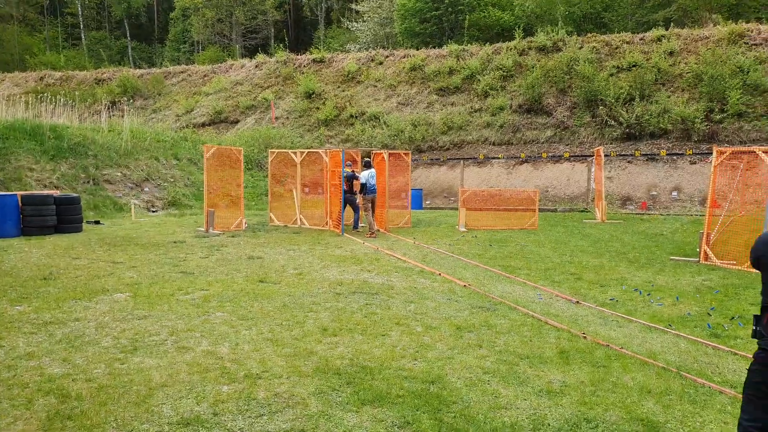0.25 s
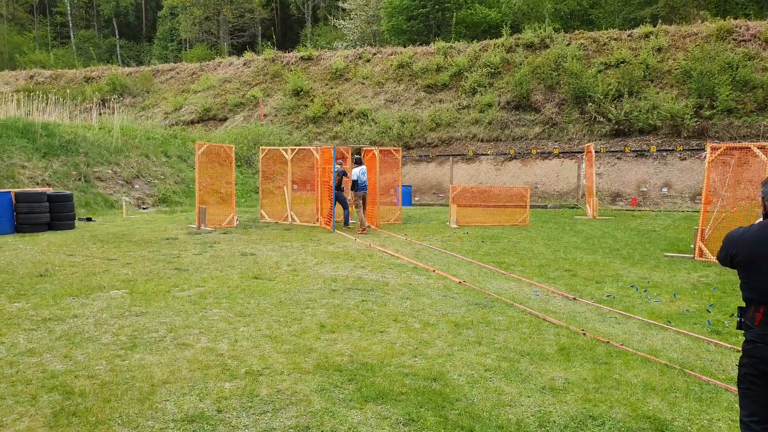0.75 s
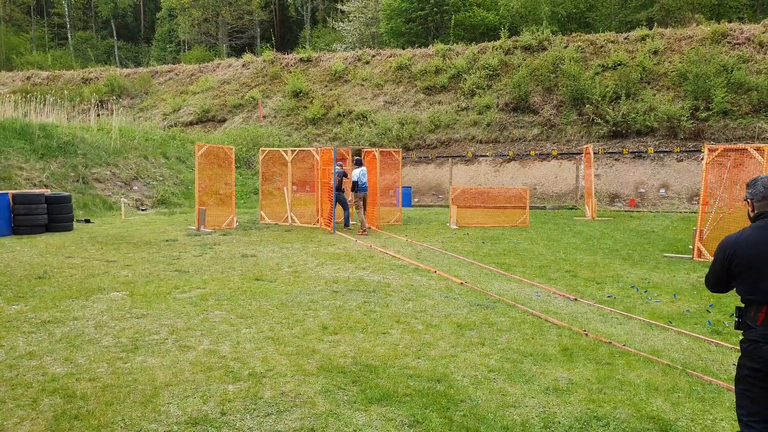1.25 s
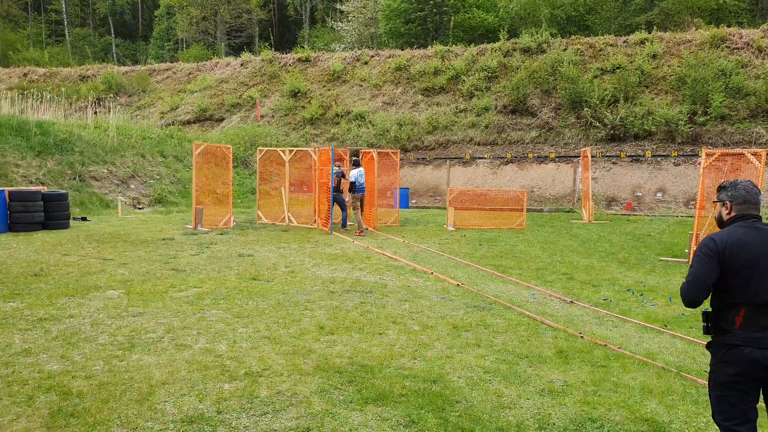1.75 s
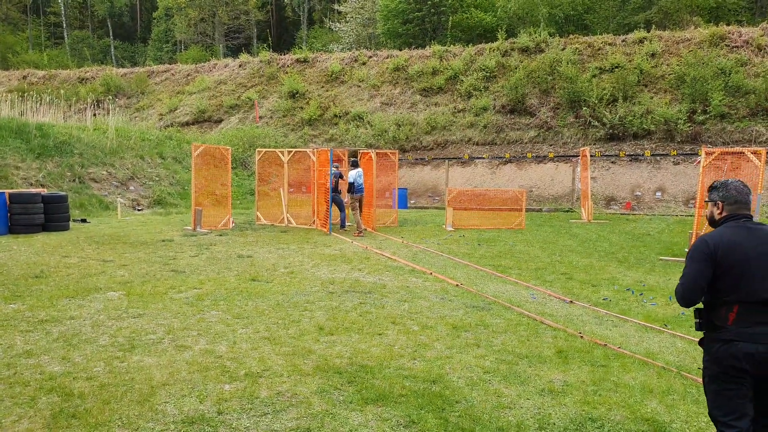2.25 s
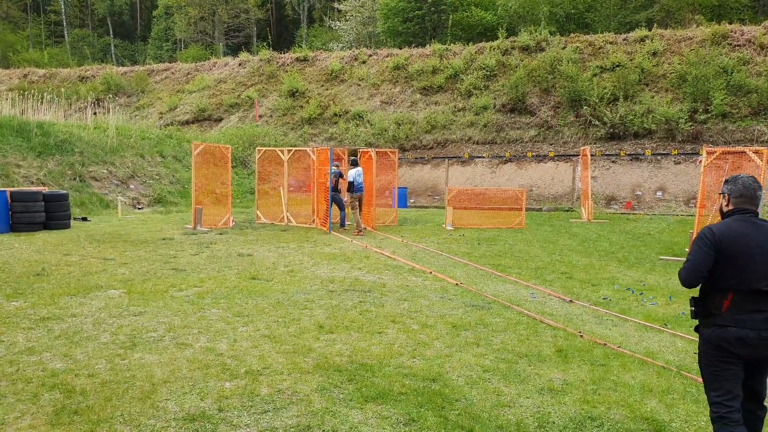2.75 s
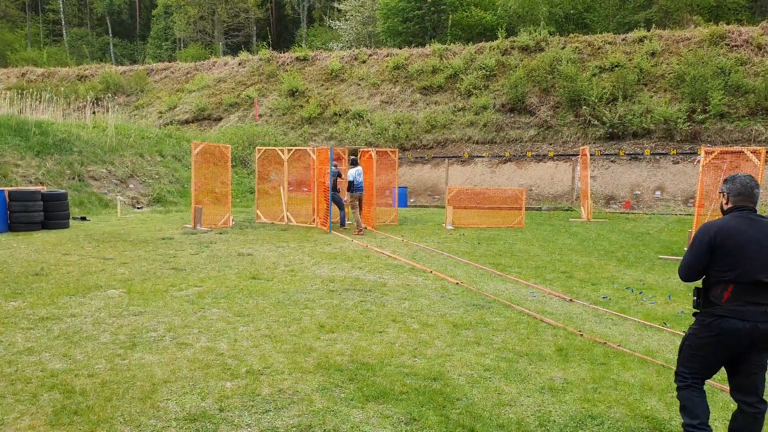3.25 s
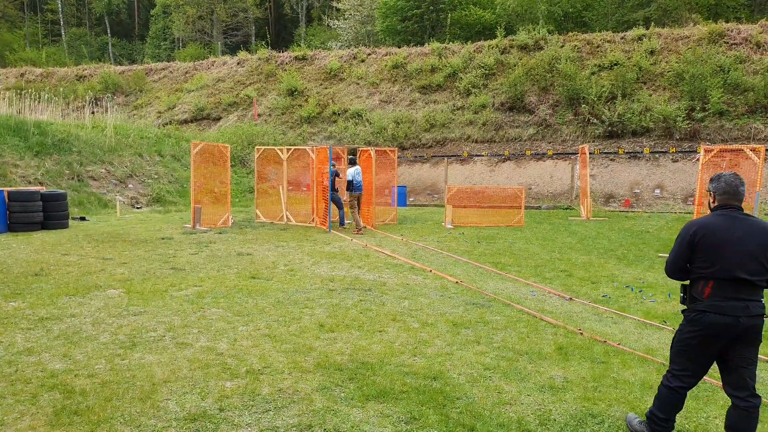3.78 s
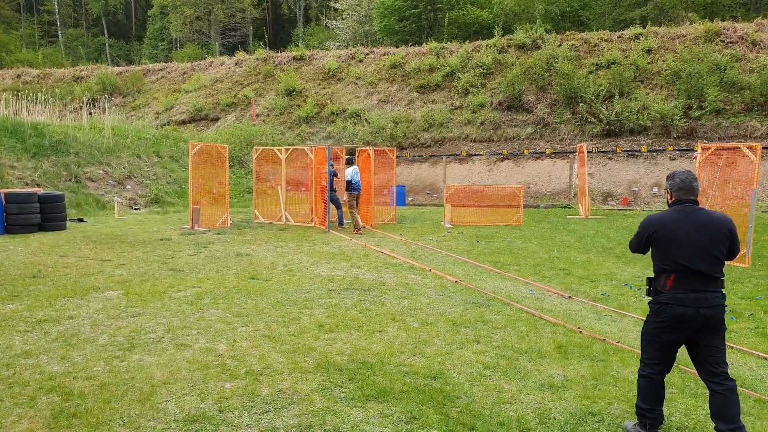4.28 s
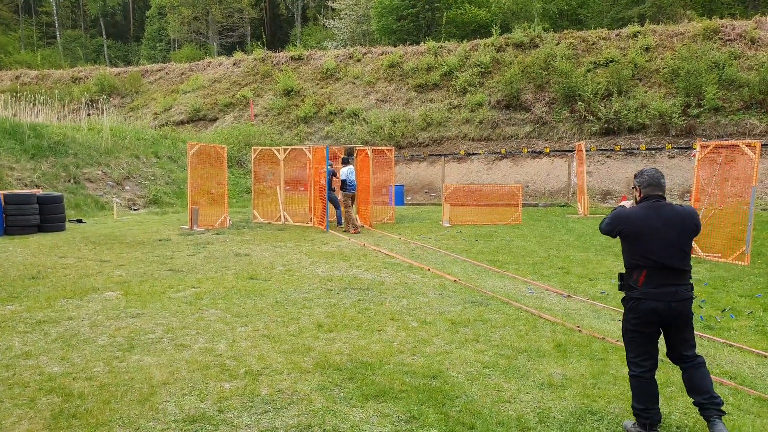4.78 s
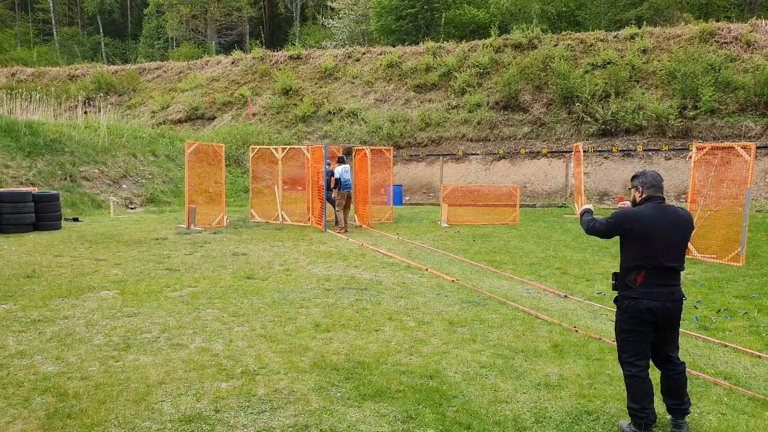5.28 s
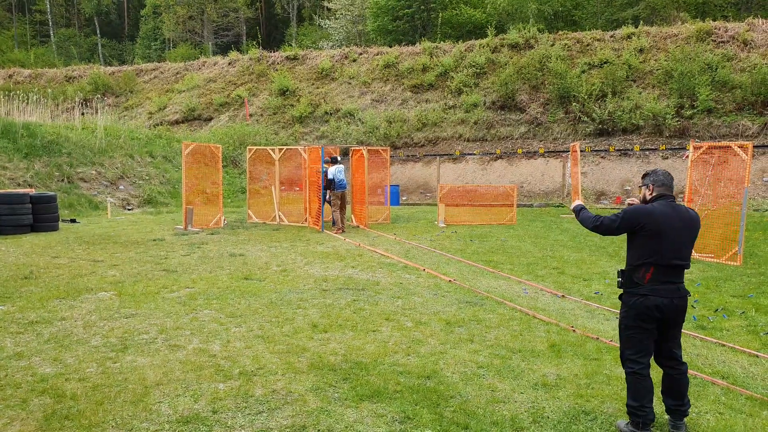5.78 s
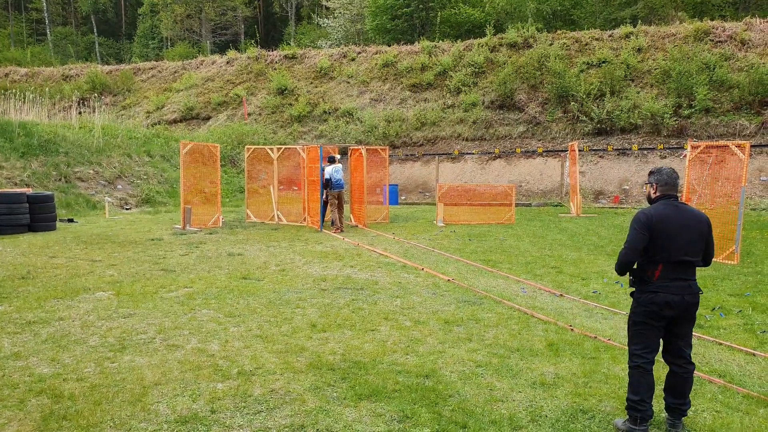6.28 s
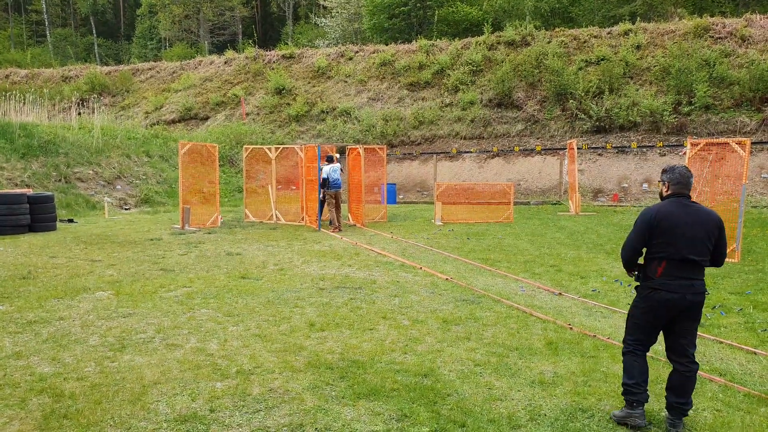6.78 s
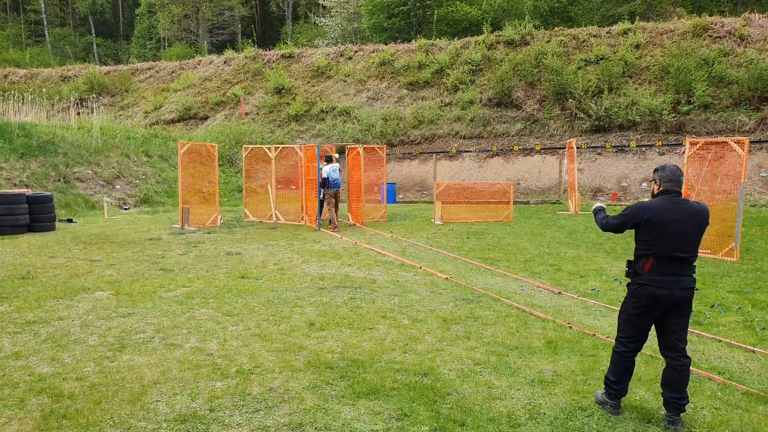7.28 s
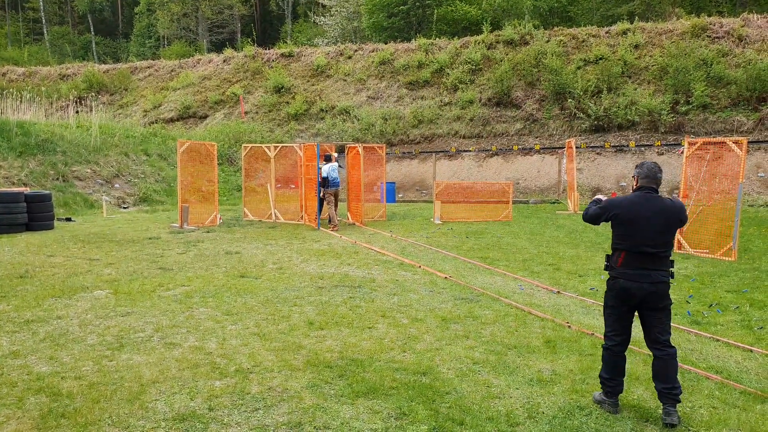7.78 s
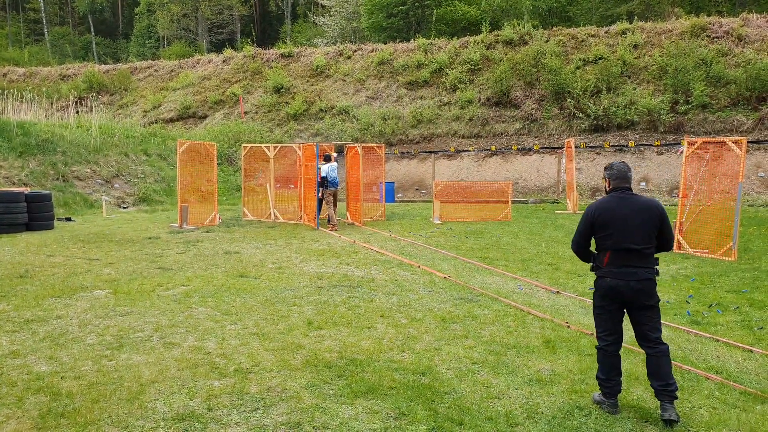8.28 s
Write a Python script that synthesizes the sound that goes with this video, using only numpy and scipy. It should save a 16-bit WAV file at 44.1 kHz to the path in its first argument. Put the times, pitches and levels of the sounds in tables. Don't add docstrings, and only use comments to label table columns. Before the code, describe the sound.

Loud single shotgun shots, three followed by pellets hitting ringing steel, roll off earth banks and trees while a gun is worked in gusty wind.

```python
import sys
import numpy as np
from scipy import signal
from scipy.fft import rfft, irfft
from scipy.io import wavfile
from scipy.ndimage import uniform_filter1d, minimum_filter1d

SR = 44100
rng = np.random.default_rng(int(sys.argv[2]) if len(sys.argv) > 2 else 0)


def to_linear_factor(level_db):
    exponent = np.asarray(level_db, float) / 20
    return 10 ** exponent


def put_to_file(sound):
    columns = np.atleast_2d(sound).T
    safe = np.clip(columns, -1, 1)
    whole_steps = np.round(safe * 32767)
    wavfile.write(sys.argv[1], SR, whole_steps.astype(np.int16))


N = 376128

# (time [s], blast level [dB], bass level [dB], tail length [factor])
SHOTS = [
    (1.3948, 2.5, -1.5, 1.21),
    (2.6301, 3, 0, 1.33),
    (3.3917, 2.5, 1, 1.27),
    (4.9005, 4, 6.5, 1.2),
    (7.654, 0.5, 1, 1.1),
]
STANCE_S = (.0005, 0, 0, -.0005, 0)
CRACK_DB = (-24, -36, -36, -35, -40)
# (delay [s], left level [dB], right level [dB])
FRONTS_AHEAD = [(0, 0, 0), (.0362, -1, -3), (.0395, -8, -7), (.041, -6, -6), (.0485, -6, -7),
                (.076, -11, -8), (.0435, -8, -8), (.082, -11, -9), (.084, -8, -4), (.086, -10, -7),
                (.088, -11, -7)]
FRONTS_ASIDE = [(0, -1, 0), (.0235, -9, -8), (.0343, -2, -3), (.036, -6, -6), (.0385, -6, -5),
                (.0415, -5, -5), (.0742, -9, -7), (.0818, -6, -1)]
# (delay [s], scatter level [dB], fade [s], bass [dB], treble [dB])
BANKS_AHEAD = [(.001, -15, 0.0065, 8, -2), (.007, -25, .006, 0, 0), (0.012, -24, 0.037, 3, 4),
               (0.0378, -11, 0.0042, 0, -4), (0.0369, -15.5, 0.006, -2, -8.5), (.047, -21, 0.02, -18, 7),
               (.062, -21, .015, 3.5, 12.5), (.074, -18, 0.0044, 2.5, -0.5), (.082, -17.5, 0.0089, -1, 1),
               (.102, -19, 0.016, 19.5, 16), (.118, -26.5, 0.0055, -2, 17)]
BANKS_ASIDE = [(.001, -14, 0.006, 0, -3), (.013, -15.5, 0.021, -8, -6), (0.0353, -15.5, 0.0065, 0, 3),
               (0.037, -9.5, 0.009, -3, -19), (0.051, -21, 0.03, -11, 6), (.07, -14, .006, -11, -14),
               (.08, -11, 0.0065, -24, -12), (0.093, -23.5, 0.027, -17, -2)]
# (delay [s], scatter level [dB], fade [s])
SLOPES_AHEAD = [(.186, -33, 0.012), (.232, -30.5, .012), (.285, -32, 0.012), (.33, -35, 0.02),
                (.36, -37, .01), (0.394, -32, 0.008), (.455, -38, .01), (.486, -29, .012), (.508, -34, .01),
                (.534, -31, 0.012), (.572, -38, .01), (.597, -36, 0.01), (.615, -38, .012),
                (.695, -44, .01), (.745, -42, .012)]
SLOPES_ASIDE = [(.165, -32.5, 0.061), (.225, -28, 0.026), (.285, -29.5, .0255), (.4, -30, 0.005)]
SLOPE_BASS_DB, SLOPE_TREBLE_DB_PER_S = -24, -42
SHOT_TREBLE_DB = 3.5
FRONT_LAG, LAG_PER_S = 2.9, 26
RIGHT_BANK_S, RIGHT_BANK_LAG = (.07, .09), -2.5
CRACK_LEAD_S, CRACK_FADE_S = .0035, .012


def gun():
    out = np.zeros((2, N))
    surfaces = rng.standard_normal((28, 2, 8192))
    for k, (s, db, bass_db, stretch) in enumerate(SHOTS):
        aside = k == 4
        fronts = FRONTS_ASIDE if aside else FRONTS_AHEAD
        near = BANKS_ASIDE if aside else BANKS_AHEAD
        far = SLOPES_ASIDE if aside else SLOPES_AHEAD
        echoes = near + [(*row, SLOPE_BASS_DB, SLOPE_TREBLE_DB_PER_S * row[0]) for row in far]
        shift = STANCE_S[k]
        shot = woods(stretch, SHOT_TREBLE_DB)
        for surface, (delay, echo_db, fade_s, low_db, high_db) in zip(surfaces, echoes):
            from_right = RIGHT_BANK_S[0] < delay < RIGHT_BANK_S[1]
            lag = RIGHT_BANK_LAG if from_right else FRONT_LAG + LAG_PER_S * delay
            treble_hz = 3000 / (1 + 2.5 * delay)
            sound = echo(surface, echo_db, fade_s, low_db + bass_db, high_db + SHOT_TREBLE_DB, treble_hz, lag)
            add(shot, delay + shift * (delay > .03), sound)
        add(shot, .065, boom(bass_db - (30 if aside else 22.5)))
        add(out, s, to_linear_factor(db) * shot)
        crack = echo(surfaces[-1], CRACK_DB[k], CRACK_FADE_S, -6, -8.5, 4500, FRONT_LAG)
        add(out, s - CRACK_LEAD_S, crack)
        for delay, left_db, right_db in fronts:
            wander, ground, ground_s = 0, .6, .00108
            if delay > .037:
                wander, ground, ground_s = rng.uniform([-.0004, .15, .0005], [.0004, .5, .0016])
            add(out, s + delay + wander + shift * (delay > 0), front(left_db, right_db, ground, ground_s))
    for modes, (s, *strike) in zip(PLATES, STRIKES):
        add(out, s, plate(modes, *strike))
    return out


# (frequency [Hz], level [dB], t60 [s])
CASE_RING = [
    (3100, -13, .004),
    (6100, -17, .008),
]


def front(left_db, right_db, ground, ground_s):
    unit_s = .00013
    u, later = np.arange(400) / (unit_s * SR), ground_s / unit_s

    def jump(u):
        return np.exp(-(u - 1.5) ** 2) - .4 * np.exp(-((u - 4.4) / 1.9) ** 2)

    wave = 1.05 * jump(u) + ground * jump(u - later) + .4 * ground * jump(u - 1.9 * later)
    t = np.arange(len(wave)) / SR
    ring = sum(to_linear_factor(db - 60 * t / t60) * np.sin(2 * np.pi * hz * t) for hz, db, t60 in CASE_RING)
    wave = wave + np.convolve(np.diff(wave, prepend=0), ring)[:len(wave)]
    shadowed = signal.lfilter([0, 0, 0, 0, 0, .38], [1, -.55], wave)
    return to_linear_factor([[left_db], [right_db]]) * np.array([wave, shadowed])


# (frequency [Hz], density [dB per Hz])
BLAST = [(30, -29.5), (60, -15.5), (110, -15), (200, -8), (300, 0.5), (420, -8.5), (620, 2.5), (800, -11),
         (1100, -10.5), (1900, -5.5), (3400, -10.5), (4700, -18), (6200, -19), (8000, -29.5), (12500, -33),
         (15000, -45)]


def echo(surface, db, fade_s, bass_db, treble_db, treble_hz, lag):
    t = np.arange(8192) / SR
    sizes = to_linear_factor(4 * evened(uniform_filter1d(rng.standard_normal(len(t)), 25)))
    spray = (surface + 0.35 * rng.standard_normal(surface.shape)) * evened(sizes)
    a, b = spray * np.exp(-t / fade_s) * np.minimum(t / (.15 * fade_s), 1)
    tone = rng.uniform(.88, 1.15)

    def colour_db(hz):
        bass = bass_db / (1 + (hz / 250) ** 2)
        treble = treble_db / (1 + (treble_hz / (hz + 1)) ** 2)
        air_loss = 6 * (3000 / treble_hz - 1) * (hz / 12000) ** 2
        return read(BLAST, hz * tone) + bass + treble - air_loss

    return to_linear_factor(db) * ports(a, b, lag, colour_db)


def boom(db, hz=105, width_s=0.0053):
    t = np.arange(1800) / SR - .02
    return to_linear_factor(db) * np.cos(2 * np.pi * hz * t) * np.exp(-(t / width_s) ** 2 / 2) * np.ones((2, 1))


# (frequency [Hz], density [dB per Hz])
WOODS = [(40, -34), (100, -17), (250, -14.5), (470, -6.5), (620, -5.5), (760, -11), (950, -5.5), (1400, -7),
         (1950, -7), (2700, -14), (3300, -18), (5000, -26), (5900, -23.5), (9000, -36.5), (12000, -41),
         (14000, -55)]
# (frequency [Hz], t60 [s])
WOODS_T60 = [(100, 0.39), (250, 0.78), (520, 1.694), (950, 1.36), (1400, 1.35), (1900, 1.52), (2700, 1.13),
             (3300, 1.25), (5000, 1), (8000, 0.81), (11000, .6), (13000, 0.27)]
WOODS_DB = -31
PORT_KNEE_HZ = 1289
GAP_S, GAP_HALF_S, GAP_DB = .155, 0.025, -2


def woods(stretch, treble_db):
    clumps = rng.standard_normal((257, 700))
    clumps = evened(uniform_filter1d(uniform_filter1d(clumps, 5, 0), 7, 1))
    stands = evened(uniform_filter1d(rng.standard_normal(700), 4))

    def level_db(hz, t):
        decay = read(WOODS, hz) - 60 * (t - .25) / (stretch * read(WOODS_T60, hz))
        return decay + treble_db * (hz > 3000) + (3.6 * clumps + 1.2 * stands) / (1 + hz / 4000)

    tail = field(level_db, 700, 20, knee_hz=PORT_KNEE_HZ)
    t = np.arange(tail.shape[1]) / SR
    tail /= np.sqrt(np.mean(tail[:, round(.15 * SR):round(.35 * SR)] ** 2))
    gap_db = GAP_DB * np.exp(-((t - GAP_S) / GAP_HALF_S) ** 2)
    return to_linear_factor(WOODS_DB + gap_db) * tail * (1 - np.exp(-t / 0.06))


# (time [s], patter level [dB], patter centre [Hz], patter spread [factor], ring level [dB])
STRIKES = [
    (1.4579, -10.5, 5900, 1.9, -37.5),
    (2.6937, -10, 8400, 1.65, -21.5),
    (3.454, 7.5, 3240, 1.1, -27),
]
# (frequency [Hz], level [dB], t60 [s])
PLATES = [
    [(4770, 2.5, .25), (5600, -2, .3), (10560, -12.5, .3)],
    [(2750, 0, .45), (4400, -1, .4), (5350, -5, 0.3), (5770, -5, .5), (7770, -10, .4), (10450, -6, .4)],
    [(4480, -7, 0.34), (5735, 3, 0.55), (8700, -6, 0.25)],
]


def plate(modes, patter_db, patter_hz, spread, ring_db):
    t = np.arange(SR // 2) / SR

    def sway():
        return .8 + .5 * evened(uniform_filter1d(rng.standard_normal(len(t)), 900))

    ring = sum(sway() * to_linear_factor(db - 60 * t / t60) * np.sin(2 * np.pi * (hz * t + rng.random()))
               for hz, db, t60 in modes)
    ring *= 1 - np.exp(-t / .015)
    patter = rng.standard_normal(len(t)) * np.exp(-((t - .002) / 0.0011) ** 2)
    edges_hz = [patter_hz / spread, min(patter_hz * spread, SR / 3)]
    band = signal.butter(2, edges_hz, "band", fs=SR, output="sos")
    strike = to_linear_factor(patter_db) * signal.sosfilt(band, patter) + to_linear_factor(ring_db) * ring
    return np.array([strike, 0.065 * np.roll(strike, 6)])


# (time [s], peak level [dB], centre [Hz], hiss share [0-1])
CLACKS = [(0.128, -50.5, 2840, 0.94), (2.09, -43, 2710, 0.43), (4.2192, -43, 2590, 0.45),
          (4.261, -52, 2520, 0.8), (4.4208, -46, 2500, 0.7), (4.4609, -58, 4240, 0.2),
          (4.4833, -34.5, 3330, 0.5), (4.527, -41, 2590, 0.4), (4.601, -47, 3460, 0.4),
          (4.6466, -37, 3300, 0.5), (4.6538, -40, 3300, 0.5), (4.6877, -44.5, 3070, 0.5),
          (5.618, -48.5, 2880, 0.3), (6.547, -53, 2780, 0.47), (6.588, -60, 2800, .45),
          (6.6438, -56, 2740, 0.46), (6.8668, -45, 2550, 0.5), (6.9104, -43, 2150, 0.53),
          (6.929, -48, 2900, 0.4), (6.954, -47, 1800, .25), (6.967, -38.5, 5800, 0.8),
          (6.979, -44, 2980, 0.8), (7.025, -46, 6640, 0.3), (7.9494, -47, 3330, 0.52),
          (8.4389, -45, 3820, 0.66), (8.4794, -66, 2500, 0.51)]
# (frequency [Hz], density [dB per Hz])
CLACK = [(350, -20), (620, -1), (800, -11), (1500, -14), (1820, 2), (2000, -6), (2170, 0), (2450, -13),
         (2800, -7), (3250, -5), (4500, -14), (6300, -6), (7500, -24), (15000, -36)]
# (frequency [Hz], level [dB], t60 [s])
RECEIVER = [(620, 1, .16), (1780, -4, .1), (2170, -4, .08), (2900, -7, .06), (3300, -6, .06),
            (5800, -10, .08), (6500, -13, .05)]
# (time [s], peak level [dB], frequency [Hz])
TICKS = [
    (0.608, -53, 3260),
    (0.6357, -49, 3350),
    (0.659, -40.5, 3220),
    (0.6913, -57, 3140),
    (2.469, -61, 6400),
    (2.506, -62, 6000),
    (6.238, -68.5, 6400),
    (6.268, -69, 6400),
    (6.415, -64, 6230),
]
CLACK_FADE_S, RECEIVER_DB = 0.0055, -7


def action():
    out, t = np.zeros((2, N)), np.arange(8192) / SR
    rise = np.minimum(t / 0.002, 1)
    for s, db, hz, hiss in CLACKS:
        shape = np.exp(-t / CLACK_FADE_S) * rise + 0.08 * np.exp(-t / 0.067)
        a, b = rng.standard_normal((2, len(t))) * shape

        def colour_db(f):
            peak = 2.5 - 10 * np.log10(1 + ((f - hz) / 200) ** 4)
            return np.maximum(read(CLACK, f) + 40 * (hiss - .5), peak)

        add(out, s, to_linear_factor(db - 1.0) * ports(a, b, 5.8, colour_db))
        ring = 0
        for mode_hz, mode_db, t60 in RECEIVER:
            weaker, detune = rng.random(2)
            decay = to_linear_factor(mode_db - 8 * weaker - 60 * t / t60)
            ring = ring + decay * np.sin(2 * np.pi * mode_hz * (.96 + .08 * detune) * t)
        add(out, s + .001, to_linear_factor(db + RECEIVER_DB) * np.array([ring, .8 * np.roll(ring, 5)]) * rise)
    for s, db, hz in TICKS:
        tick = to_linear_factor(db + 4.5) * np.sin(2 * np.pi * hz * t) * np.exp(-((t - .002) / 0.00057) ** 2)
        add(out, s - .001, np.array([tick, 0.37 * np.roll(tick, 3)]))
    return out


# (time of peak [s], level [dB], length [s])
STROKES = [(.03, -84, 0.49), (0.564, -81, 0.092), (0.663, -79, 0.066), (4.249, -71.5, 0.054),
           (4.415, -74, 0.022), (4.489, -59, 0.078), (4.649, -58.5, 0.028), (4.719, -79.5, 0.23),
           (5.57, -69.5, 0.047), (6.589, -78.5, .12), (6.874, -66, 0.05), (6.974, -55.5, 0.027),
           (7.014, -68, 0.037), (7.102, -85.5, 0.31), (7.957, -53, 0.035), (8.456, -72, 0.06)]
# (frequency [Hz], density [dB per Hz])
SLIDE = [(1200, -26), (2000, -1), (3300, 1.5), (4500, -2), (6000, 3.5), (8000, -10), (10500, -9),
         (14500, -14), (15500, -22)]
STROKE_RISE, STROKE_EDGE_DB = 0.14, -7.5


def rustle():
    t = np.arange(0, N / SR, .002)
    strokes = sum(swell(t, s, db, STROKE_EDGE_DB, STROKE_RISE * length, length, power=0.86)
                  for s, db, length in STROKES)
    strokes = np.interp(np.arange(N) / SR, t, strokes)
    hiss = evened(field(lambda hz, t: read(SLIDE, hz) + 0 * t, N // 128 + 5, 4.0)[:, :N])
    grain = to_linear_factor(1.3 * evened(uniform_filter1d(rng.standard_normal(N), 200)))
    return to_linear_factor(10.5) * strokes * hiss * grain


# (time [s], level [dB])
BREEZE = [(0, -41.5), (.7, -54), (1.2, -62), (1.75, -53), (2.05, -76.5), (2.6, -74.5), (2.9, -61),
          (3.3, -73), (3.6, -58), (4.1, -59.5), (4.45, -69.5), (5.0, -37.5), (5.45, -62.5), (6.2, -61),
          (6.9, -67), (7.3, -61.5), (7.8, -50), (8.5, -85.5)]
# (time [s], peak level [dB], half length [s], flutter above the gust [dB])
GUSTS = [(-0.02, -34, 0.1, -2), (0.104, -36.5, 0.042, -1), (0.248, -29, 0.011, -34), (0.345, -46, 0.066, 0),
         (0.404, -58, 0.042, 1.5), (0.746, -38, 0.075, -5), (0.864, -35, 0.035, -15),
         (0.977, -43, 0.076, 2), (1.314, -56, 0.029, -36), (1.792, -61, 0.033, -18),
         (3.018, -43, 0.027, -22), (3.788, -41, 0.035, -15), (4.122, -57, 0.051, 10),
         (4.3, -50, 0.12, -1.5), (4.544, -40, 0.018, -6.5), (4.653, -51, 0.026, -23),
         (4.757, -37, 0.028, -2), (4.866, -41.5, 0.032, 0), (5.147, -38.5, 0.06, -21),
         (5.282, -43, 0.036, -24), (5.53, -51, 0.053, -13.5), (5.73, -48.5, 0.12, 0.5),
         (6.018, -46.5, 0.081, 0), (6.378, -46.5, 0.031, -7), (6.453, -44, 0.036, -15),
         (6.646, -38.5, 0.083, -6.5), (6.77, -43.5, 0.17, -4), (7.072, -46.5, 0.12, -7.5),
         (7.499, -37, 0.038, -15), (7.643, -39, 0.049, -10)]
# (frequency [Hz], density [dB per Hz])
GUST = [(12, -42), (20, -8), (49, 1.5), (76, 7.5), (101, -3.5), (200, -16.5), (260, -62.5), (440, -120)]
# (time [s], left minus right [dB])
WIND_PAN = [(0, 1.5), (.7, 8.5), (1.3, 6.5), (4.5, 0.5), (6, 2.5), (6.7, 7), (7.3, -1.5), (8.5, 2)]
LUMP_DB, LUMP_S, BREEZE_FLUTTER_DB = 3.5, 0.062, -7.5
GUST_EDGE_DB = -23


def wind():
    t, fine_t = np.arange(0, N / SR, .002), np.arange(N) / SR
    slow = signal.butter(2, 1 / LUMP_S, fs=500, output="sos")
    lumps = evened(signal.sosfilt(slow, rng.standard_normal(len(t))))
    push = to_linear_factor(np.interp(t, *np.transpose(BREEZE)) + LUMP_DB * lumps)
    flap = push * to_linear_factor(BREEZE_FLUTTER_DB)
    for s, db, half_s, flutter_db in GUSTS:
        bump = swell(t, s, db, GUST_EDGE_DB, half_s, half_s, power=1.41)
        push = push + bump
        flap = flap + bump * to_linear_factor(min(flutter_db, 0))
    pan_db = np.interp(t, *np.transpose(WIND_PAN))
    push, flap, pan_db = (np.interp(fine_t, t, curve) for curve in (push, flap, pan_db))

    def eddies(lag):
        return field(lambda hz, t: read(GUST, hz) + 0 * t, N // 512 + 5, lag, size=2048)[:, :N]

    shared, apart = eddies(-15), eddies(0)
    gust = shared + 1.8 * np.array([apart[0], apart[0, ::-1]])
    gust /= np.sqrt(uniform_filter1d(gust.mean(0) ** 2, 2500) + 1e-9)
    band = signal.butter(3, [130, 400], "band", fs=SR, output="sos")
    flutter = signal.sosfilt(band, rng.standard_normal((2, N)) * (1 + gust ** 2))
    return to_linear_factor(np.outer([.5, -.5], pan_db)) * (push * gust + flap * 0.47 * evened(flutter))


# (time [s], hum level [dB])
AIR = [(0, -53.5), (.4, -59.5), (.75, -56), (1.301, -61), (2.501, -73), (4.4, -72.5), (4.8, -63),
       (6.1, -68), (6.45, -61), (7.099, -56.5), (7.3, -59.5), (8.53, -58.5)]
# (frequency [Hz], density [dB per Hz])
HUM = [(100, -24.5), (200, -16), (330, -9.5), (600, -7), (950, -2.5), (1400, -5.5), (2150, -13),
       (2450, -24.5), (4000, -47.5)]
LEAVES = [(2000, -23), (2500, -9), (3300, 0), (3950, 0.5), (4300, -10), (6500, -8.5), (7300, -26.5),
          (15000, -59.5)]
LEAF_DB, LEAF_CALM_S, LEAF_DB_PER_S = -13, 5.93, -8.5


def air():
    t, frames = np.arange(N) / SR, N // 128 + 5
    patches = rng.standard_normal((257, frames))
    patches = evened(uniform_filter1d(uniform_filter1d(patches, 6, 0), 30, 1))
    hum = evened(field(lambda hz, _: read(HUM, hz) + 2 * patches, frames, -15.5)[:, :N])
    leaves = evened(field(lambda hz, _: read(LEAVES, hz) + 1.2 * patches, frames, 0)[:, :N])
    leaf_db = LEAF_DB + LEAF_DB_PER_S * np.maximum(t - LEAF_CALM_S, 0)
    return to_linear_factor(np.interp(t, *np.transpose(AIR))) * (hum + to_linear_factor(leaf_db) * leaves)


def evened(x):
    return x / np.sqrt(np.mean(x ** 2) + 1e-20)


def read(points, hz):
    f, value = np.transpose(points)
    return np.interp(np.log(hz + 1), np.log(f + 1), value)


def add(mix, s, sound):
    part = mix[:, round(s * SR):][:, :sound.shape[1]]
    part += sound[:, :part.shape[1]]


def swell(t, s, db, edge_db, rise_s, fall_s, power):
    return to_linear_factor(db + edge_db * np.maximum((t - s) / fall_s, (s - t) / rise_s) ** power)


# (frequency [Hz], likeness [0-1])
SAME = [(60, 0.88), (300, 0.89), (800, 1), (1500, 0.49), (3000, 0.067), (8000, 0.36)]


def likeness(a, b, hz):
    same = np.clip(read(SAME, hz), 0, 1)
    return same * a + np.sqrt(1 - same ** 2) * b


def ports(a, b, lag, colour_db):
    size = len(a)
    hz = np.fft.rfftfreq(size, 1 / SR)
    cepstrum = irfft(np.log(to_linear_factor(np.maximum(colour_db(hz), -100))), size)
    cepstrum[1:size // 2] *= 2
    cepstrum[size // 2 + 1:] = 0
    colour = np.exp(rfft(cepstrum))
    colour /= np.sqrt(np.mean(abs(colour) ** 2))
    right = likeness(rfft(a), rfft(b), hz) * np.exp(-2j * np.pi * hz * lag / SR)
    return irfft(colour * np.array([rfft(a), right]), size)


def field(gain_db, frames, lag, size=512, knee_hz=0):
    hz, t = np.fft.rfftfreq(size, 1 / SR)[:, None], np.arange(frames) * size / 4 / SR
    a, b, c, d = rng.standard_normal((frames, len(hz), 4)).T
    left = a + 1j * b
    delay = lag * (0.32 + 0.67 / (1 + (knee_hz / (hz + 1)) ** 4)) / SR
    right = likeness(left, c + 1j * d, hz) * np.exp(-2j * np.pi * hz * delay)
    spectra = np.array([left, right]) * to_linear_factor(gain_db(hz, t))
    return signal.istft(spectra, nperseg=size, noverlap=size * 3 // 4)[1]


def scene():
    return (gun() + action() + rustle() + air()) * to_linear_factor([[.6], [-.6]]) + wind()


MASK_DB, MASK_FROM_HZ, MASK_PATCH_DB = -35, 7300, 5


def gate(x):
    hz, t, z = signal.stft(x, SR, nperseg=2048)
    middle = np.sqrt(np.mean(abs(z[:, (hz > 300) & (hz < 3000)]) ** 2, axis=(0, 1)))
    patches = rng.standard_normal((len(t), len(hz)))
    patches = evened(uniform_filter1d(uniform_filter1d(patches, 3, 0), 14, 1)).T
    weak = abs(z) < to_linear_factor(MASK_DB + MASK_PATCH_DB * patches) * middle
    weak &= (hz > MASK_FROM_HZ)[:, None]
    weak &= minimum_filter1d(middle, size=7) > middle / 10
    return signal.istft(z * ~weak, SR, nperseg=2048)[1][:, :N]


def top_cut(x):
    return signal.sosfilt(signal.butter(12, 15290, fs=SR, output="sos"), x)


def record(dry):
    thin = signal.sosfilt(signal.butter(3, 42, "high", fs=SR, output="sos"), dry)
    clipped = np.clip(thin, -1, 1)
    edge = signal.firwin(101, 14900, fs=SR)[None]
    mix = gate(signal.oaconvolve(clipped, edge, "same"))
    return top_cut(mix)


dry = scene()
out = record(dry)
put_to_file(out)
```